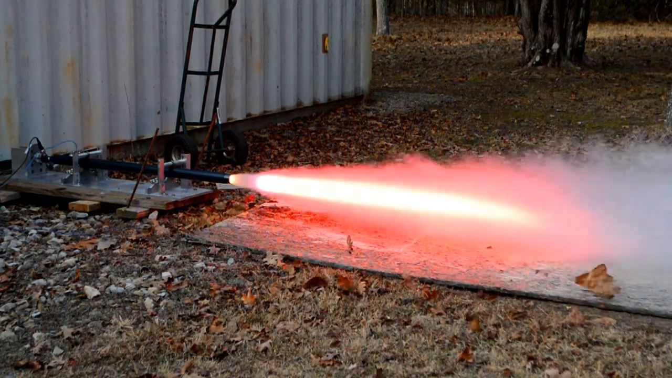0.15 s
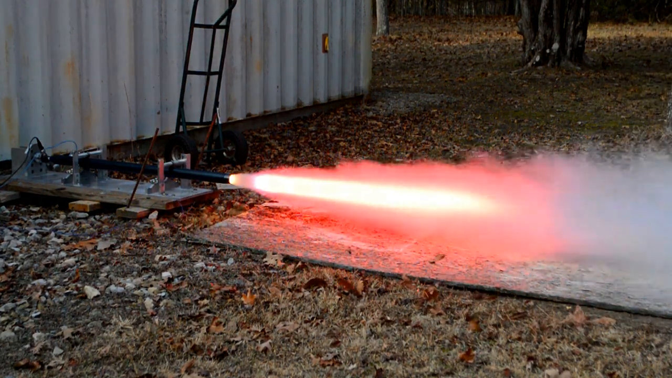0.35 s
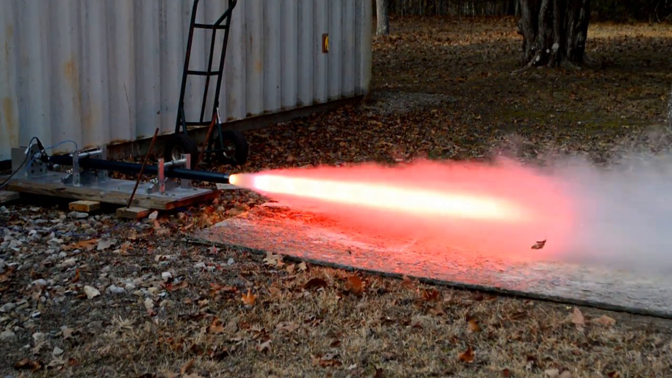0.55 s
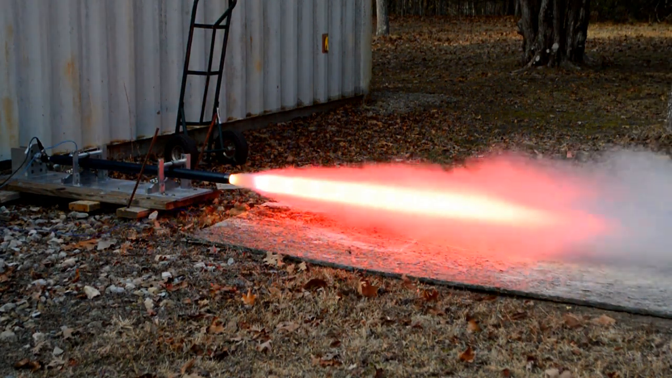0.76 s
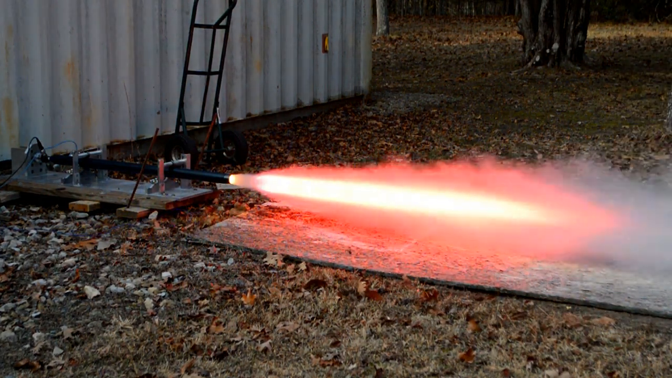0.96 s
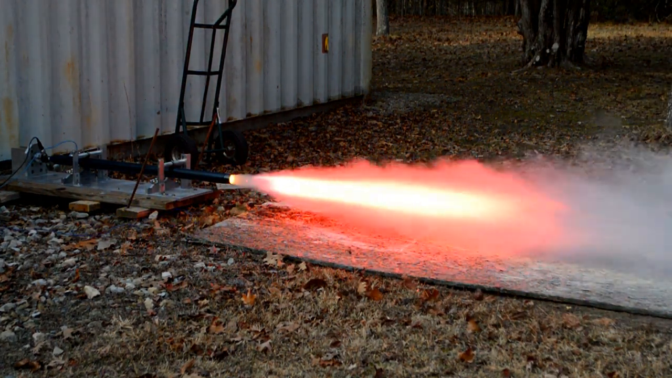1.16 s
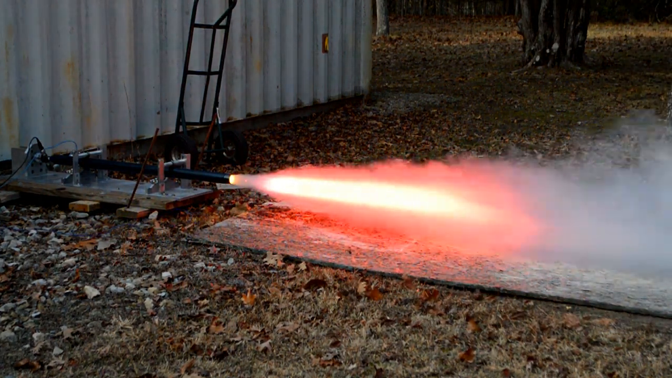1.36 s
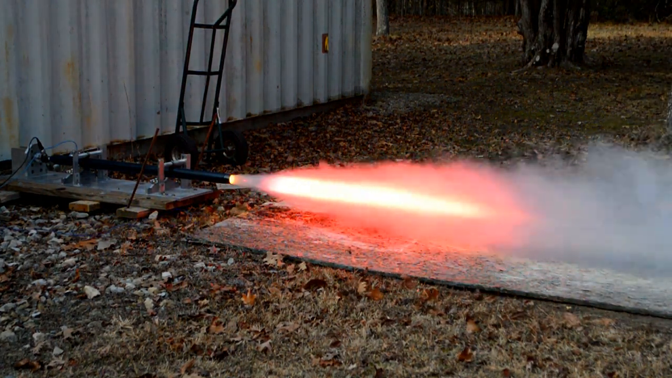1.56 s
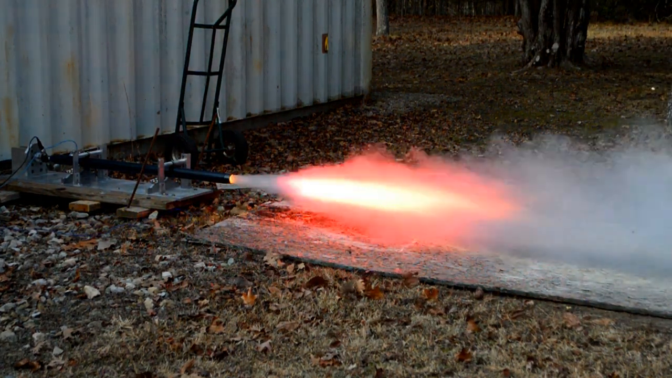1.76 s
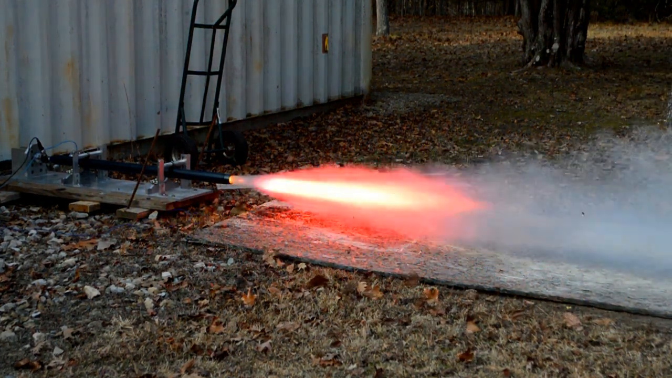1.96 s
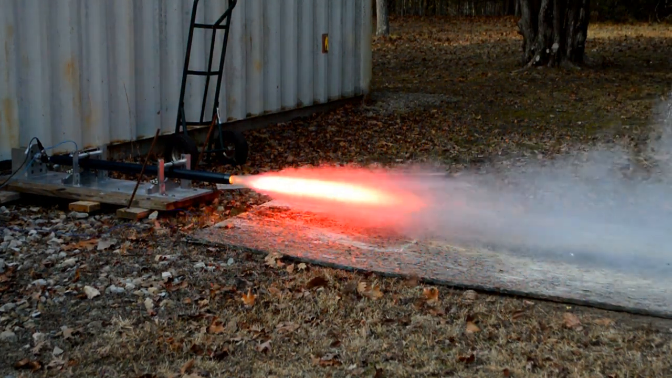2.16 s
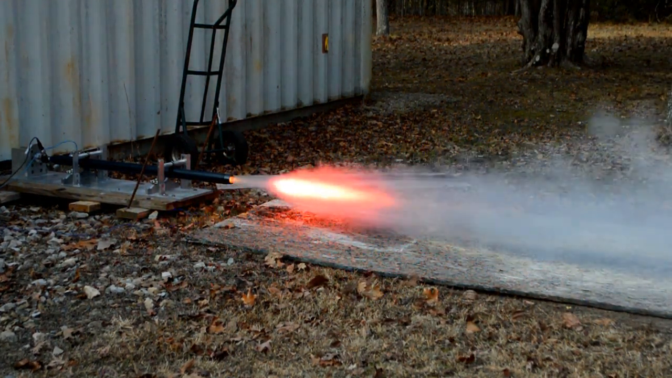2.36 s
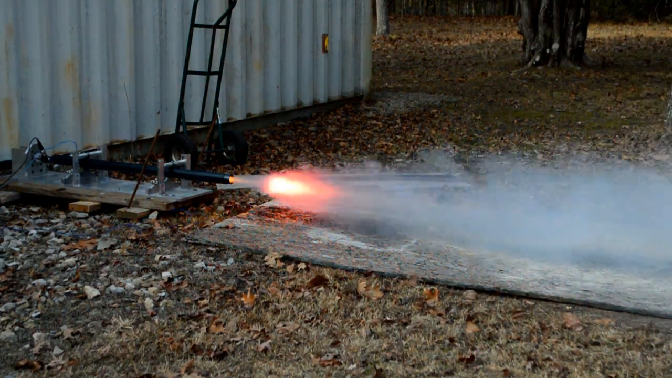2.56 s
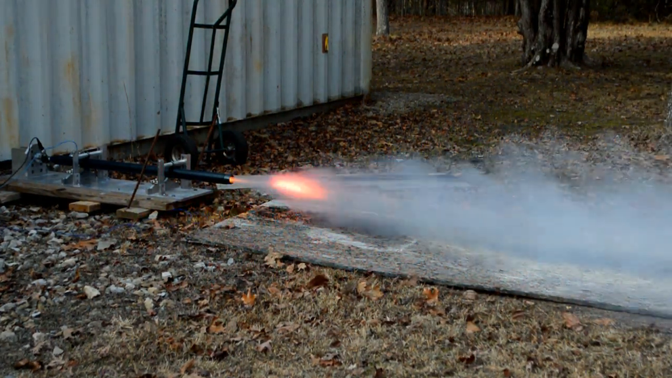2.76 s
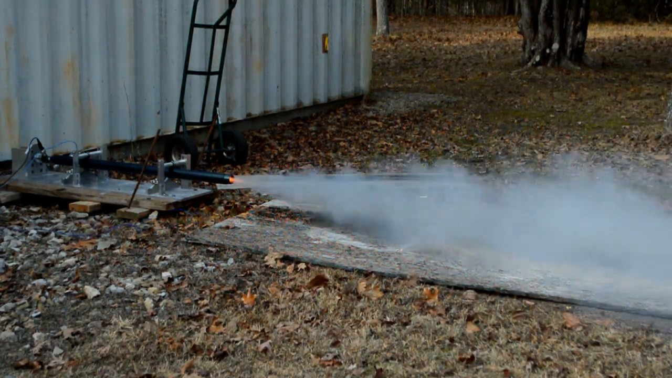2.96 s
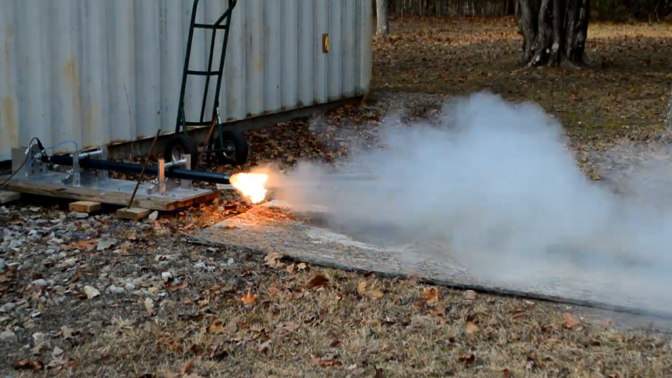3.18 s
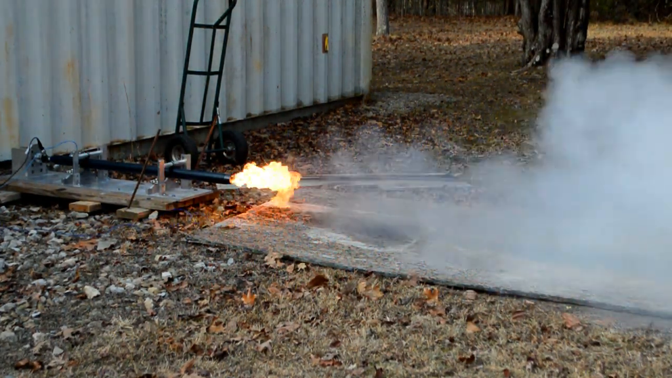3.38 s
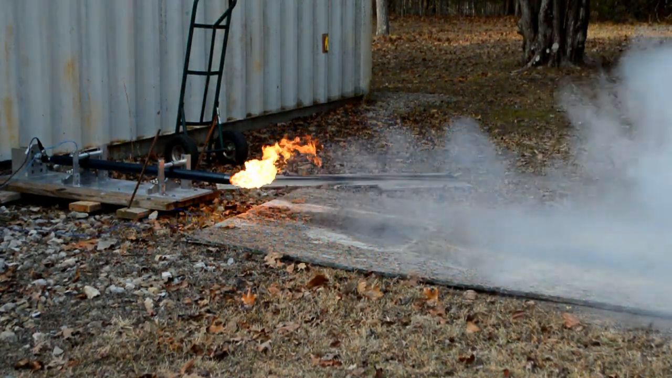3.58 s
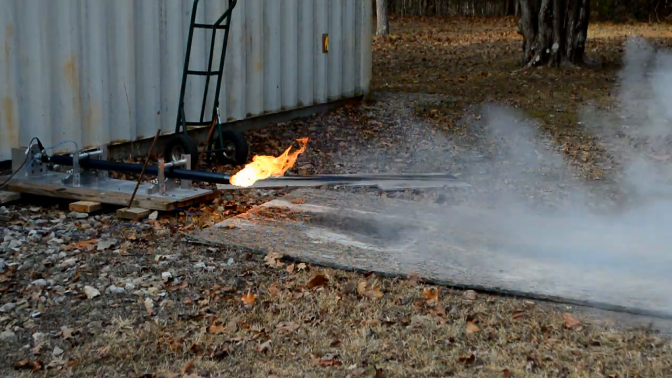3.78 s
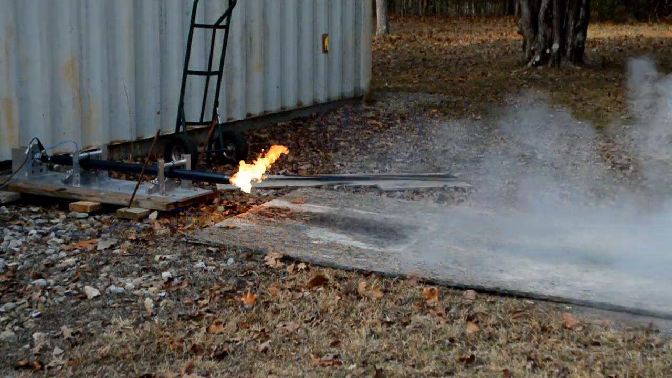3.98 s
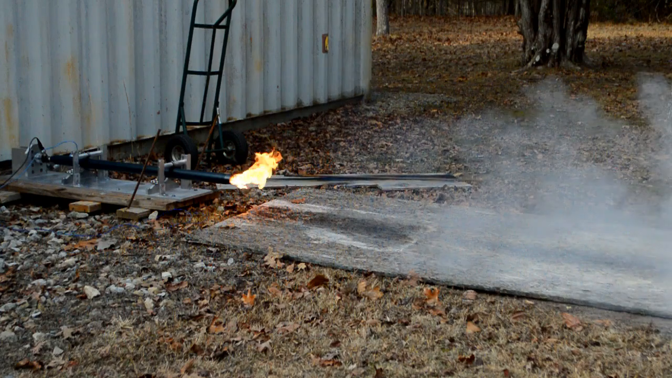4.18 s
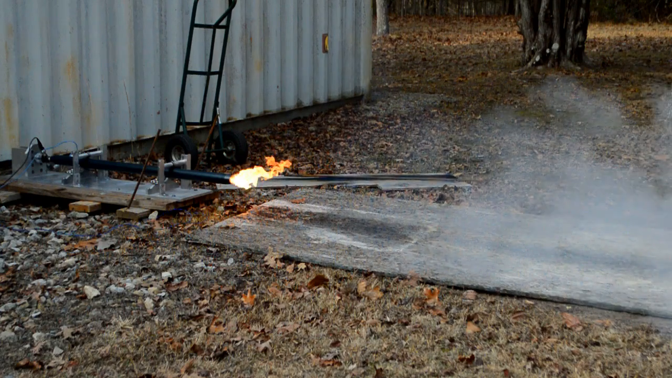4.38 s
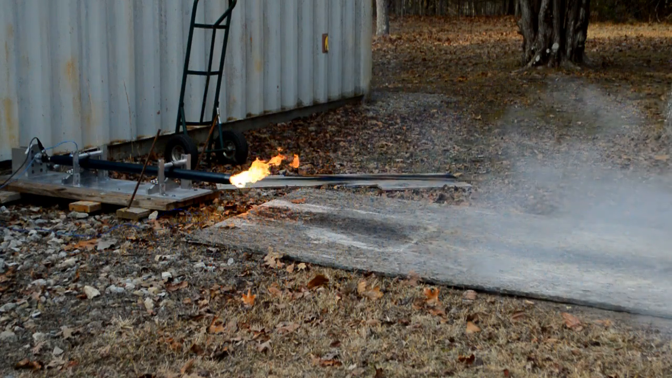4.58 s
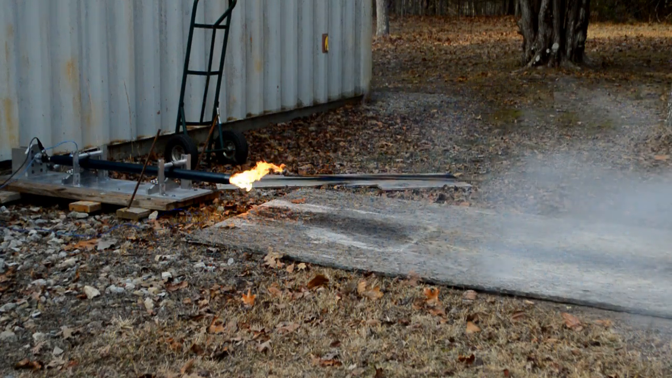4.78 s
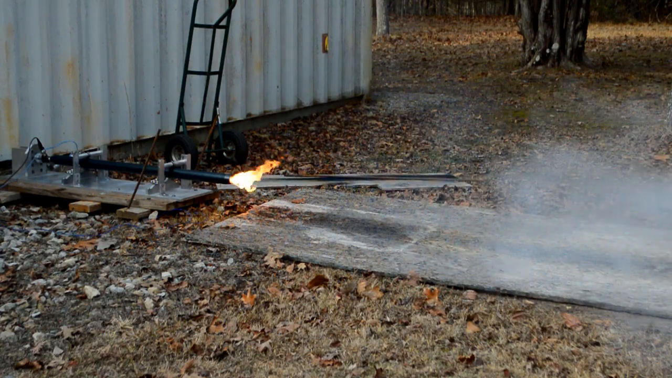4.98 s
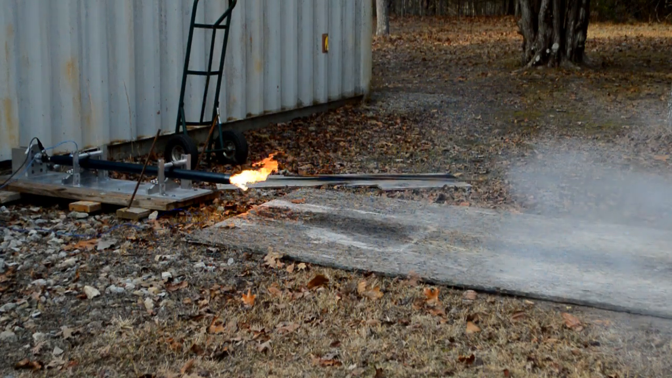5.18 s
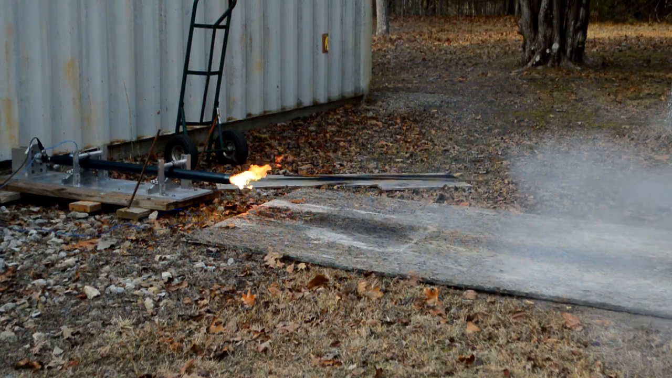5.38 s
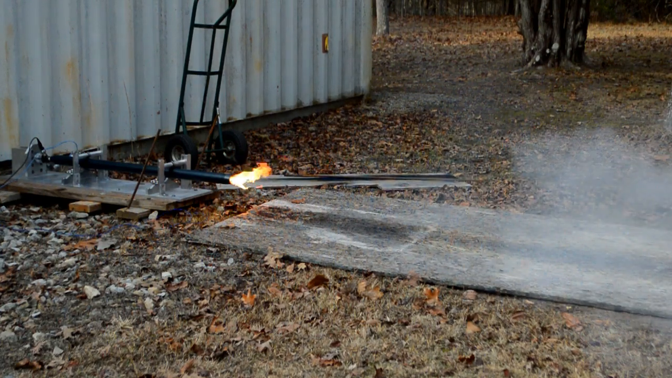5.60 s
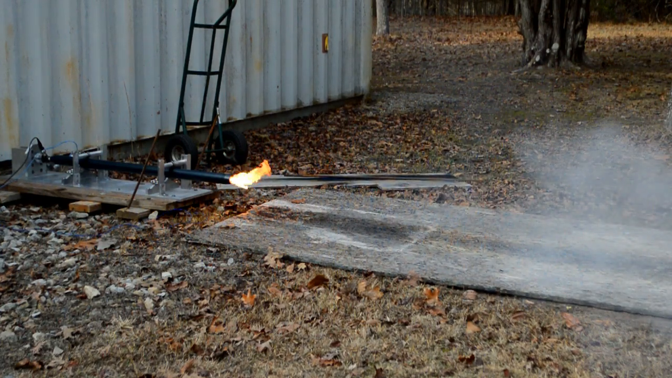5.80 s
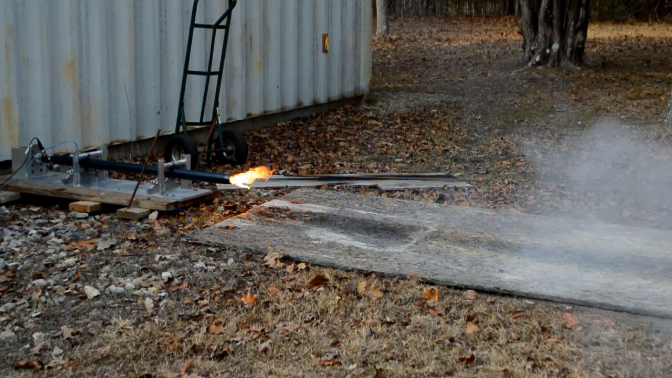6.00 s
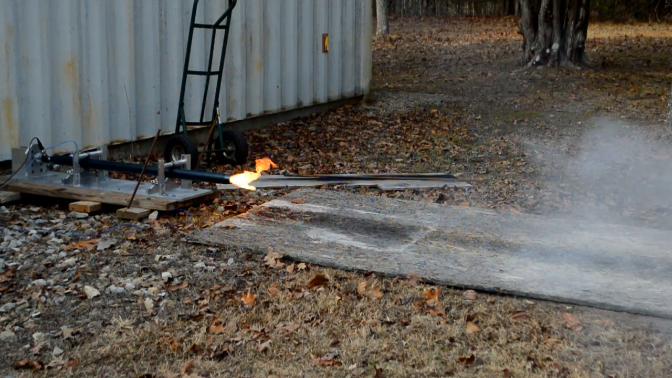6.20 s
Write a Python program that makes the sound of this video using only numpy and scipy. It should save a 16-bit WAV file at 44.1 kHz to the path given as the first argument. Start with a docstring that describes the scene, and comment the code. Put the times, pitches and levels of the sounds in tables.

```python
"""Rocket motor on a test stand

A small solid rocket motor roars outdoors: coloured noise that overloads a ringing microphone and turns its gain down.
It burns out with a sputter and a venting hiss; as the gain creeps back, bands of wavering noise make a lazy
flame that flutters and spits at the nozzle, and gas pops once in the empty casing, which rings as decaying sines.
Near the end a small bird gives one thin, buzzy call: two swooping sines with an uneven buzz in their pitch."""
import sys
import numpy as np
from scipy import signal
from scipy.fft import rfft, irfft, next_fast_len
from scipy.io import wavfile
from scipy.ndimage import uniform_filter1d, minimum_filter1d

SR = 44100
rng = np.random.default_rng(int(sys.argv[2]) if len(sys.argv) > 2 else 0)


def to_wav(sig):
    """Store sig (one row per channel, or 1-D mono) as 16-bit WAV at the path in sys.argv[1].

    Samples outside -1..1 are clipped; the rate is SR.
    """
    pcm = np.clip(np.atleast_2d(sig), -1, 1) * 32767
    pcm = np.round(pcm).astype(np.int16)
    wavfile.write(sys.argv[1], SR, pcm.T)  # frames by channels


N = 275359
TIME = np.arange(N) / SR
BURNOUT_S = 3.176  # the propellant is spent


def from_db(db):
    """Decibels to gain."""
    return 10 ** (np.asarray(db) / 20)


def rms_one(x):
    """Scale to rms 1."""
    return x / np.sqrt(np.mean(x ** 2) + 1e-20)


def noise(colour):
    """Noise of a given spectrum, rms 1, rolled off below the first frequency of its table."""
    size = next_fast_len(N)
    hz, db = np.transpose(colour)
    bins = np.fft.rfftfreq(size, 1 / SR) + 1e-3
    gain = from_db(np.interp(np.log(bins), np.log(hz), db))
    gain = gain * np.minimum(bins / hz[0], 1)
    white = rng.standard_normal(size)
    return rms_one(irfft(rfft(white) * gain, size)[:N])


def drift(rate):
    """Smooth chance with about `rate` turns a second, rms 1."""
    r = np.exp(-2 * np.pi * rate / SR)
    settled = signal.lfilter([1], [1, -2 * r, r * r], rng.standard_normal(N + SR))[SR:]
    return rms_one(settled)


def resonance(x, hz, width_hz):
    """A band-pass with gain 1 on top."""
    r = np.exp(-np.pi * width_hz / SR)
    feed = np.array([1, 0, -1]) * (1 - r * r) / 2
    return signal.lfilter(feed, [1, -2 * r * np.cos(2 * np.pi * hz / SR), r * r], x)


def ring(clicks, hz, t60):
    """A unit click sets a sine ringing from height 1; it falls 60 dB in t60 seconds."""
    r = from_db(-60 / (t60 * SR))
    w = 2 * np.pi * hz / SR
    return signal.lfilter([0, np.sin(w)], [1, -2 * r * np.cos(w), r * r], clicks + 1e-18)


def clicks_of(events):
    """One click for each row: time in seconds, height in dB."""
    out = np.zeros(N)
    for s, db in events:
        out[round(s * SR)] += from_db(db)
    return out


def fading(clicks, t60):
    """An envelope that jumps at each click and falls 60 dB in t60 seconds."""
    return signal.lfilter([1], [1, -np.exp(-np.log(1000) / (t60 * SR))], clicks + 1e-18)


def echoes(x, t60, wet_db, count=120):
    """Scattered reflections from the ground, a steel wall and tree trunks, weaker the later they come."""
    delay = rng.uniform(.002, .3, count)  # seconds
    response = np.zeros(SR)
    response[(delay * SR).astype(int)] = rng.standard_normal(count) * np.exp(-np.log(1000) * delay / t60)
    reflected = signal.fftconvolve(x, response / np.linalg.norm(response))[:N]
    return x + from_db(wet_db) * reflected


def envelope(start_s, hold_s, rise_db_per_s, fall_db_per_s):
    """A gain that rises to 1 at start_s, holds, then dies away."""
    before = np.maximum(start_s - TIME, 0)
    after = np.maximum(TIME - start_s - hold_s, 0)
    return from_db(-rise_db_per_s * before - fall_db_per_s * after) + 1e-18


def after_burnout(fall_db_per_s):
    """A gain of 1 while the motor burns that dies away afterwards."""
    return from_db(-fall_db_per_s * np.maximum(TIME - BURNOUT_S, 0)) + 1e-18


# Colour of the exhaust. Each row: frequency in Hz, relative level per Hz in dB.
JET_COLOUR = [(25, -27.5), (50, -40.5), (120, -9.5), (300, -3), (800, 2.5), (2500, 2.5), (4800, 0.5),
              (6500, 1), (8000, -0.5), (10500, -3.5), (12500, -7), (16000, -47.5)]
# Microphone resonances that the jet sets ringing. Each row: frequency in Hz, width in Hz, gain in dB.
MIC_RING = [(9500, 2170, 10.5), (5200, 2700, -15.5)]
JET_DB, COLLAPSE_DB_PER_S = 44.5, 1043.5
LINGER_DB, LINGER_DB_PER_S = -32, 205  # its echo among the trees, relative to the jet
SHORTENS_S, SHORTENING_TAKES_S = 1.77, 1.4  # the plume shortens late in the burn
GROUND_LAG_S, GROUND_SHARE_LONG, GROUND_SHARE_SHORT = 0.0002176, 0.026, 0.29  # shares 0-1, long or short plume


def jet(surge_db=2.0, wander_db=2.23, strained_hz=10300, strained_width_hz=1300, eased_db=-3):
    """Turbulent exhaust rings the microphone; a shortening plume lets the ground reflection colour it more."""
    thrust = after_burnout(COLLAPSE_DB_PER_S)
    shortened = np.clip((TIME - SHORTENS_S) / SHORTENING_TAKES_S, 0, 1)
    ground_share = GROUND_SHARE_LONG + (GROUND_SHARE_SHORT - GROUND_SHARE_LONG) * shortened
    rush = noise(JET_COLOUR)
    rush = rush + ground_share * np.interp(TIME - GROUND_LAG_S, TIME, rush)
    ringing = sum(from_db(db) * resonance(rush, hz, width) for hz, width, db in MIC_RING)
    # at full thrust the ring of the strained diaphragm spreads upwards; it eases as the plume shortens
    strain = thrust * from_db(eased_db * shortened)
    ringing = ringing + strain * resonance(noise(JET_COLOUR), strained_hz, strained_width_hz)
    surging = thrust * from_db(surge_db * drift(24))
    lingering = from_db(LINGER_DB) * after_burnout(LINGER_DB_PER_S)
    body = rms_one(rush * from_db(wander_db * drift(21.0)) + ringing)
    return from_db(JET_DB) * (surging + lingering) * body


# Colours of the sputter, the bright rush, and the roar and hiss that the flame shares.
# Each row: frequency in Hz, relative level per Hz in dB.
SPUTTER_COLOUR = [(60, -20), (180, -8), (290, 3), (420, -5), (600, 1), (870, 2), (1400, -6), (2500, -9),
                  (3600, -2), (5000, -12), (12000, -35)]
BLOWDOWN_COLOUR = [(300, -14.5), (1500, -11.5), (3200, 0.5), (5000, -1.5), (6500, -0.5), (8000, -2.5),
                   (10000, -8.5), (16000, -38)]
ROAR_COLOUR = [(200, -28), (400, -3), (600, -5), (800, -1.5), (1200, -4.5), (1500, -7), (2200, -12.5),
               (4000, -45.5)]
HISS_COLOUR = [(700, -25.5), (1200, 3.5), (1700, -5.5), (2400, -0.7), (3200, -3.5), (4500, -3.5),
               (6500, -14), (9000, -42.5), (16000, -57)]
SPUTTER_S, SPUTTER_HOLD_S, SPUTTER_DB = 3.16, .036, 21
BLOWDOWN_DB_PER_S = 72.5  # the bright rush starts to fall from 0 dB
VENT_DB, VENT_DB_PER_S, VENT_ROAR_DB = -12.5, 29, -3  # roar level relative to the hiss


def burnout():
    """A last throaty sputter, then chamber pressure hisses away: a bright rush dies fast, a duller hiss slowly."""
    sputter = from_db(SPUTTER_DB) * envelope(SPUTTER_S, SPUTTER_HOLD_S, rise_db_per_s=4000, fall_db_per_s=900)
    blowdown = after_burnout(BLOWDOWN_DB_PER_S)
    vent = from_db(VENT_DB) * after_burnout(VENT_DB_PER_S)
    dull_hiss = noise(HISS_COLOUR) + from_db(VENT_ROAR_DB) * noise(ROAR_COLOUR)
    return sputter * noise(SPUTTER_COLOUR) + blowdown * noise(BLOWDOWN_COLOUR) + vent * dull_hiss


CATCH_DB, CATCHING_TAKES_S = -3.5, 0.42  # below full strength until burnout, then growing to it
SINKS_S, SINKING_TAKES_S = 5.17, 0.14


def dwindling(full_db, fade_db_per_s, sink_db):
    """Level in dB of one part of the flame: it catches, fades steadily and sinks once by a further step."""
    age = np.maximum(TIME - BURNOUT_S, 0)
    catching = np.clip(1 - age / CATCHING_TAKES_S, 0, 1)
    sunk = np.clip((TIME - SINKS_S) / SINKING_TAKES_S, 0, 1)
    return full_db + CATCH_DB * catching - fade_db_per_s * age - sink_db * sunk


# Colours of flame flutter, liner sizzle and spits. Each row: frequency in Hz, relative level per Hz in dB.
FLUTTER_COLOUR = [(25, -2.5), (60, -6), (150, 3.5), (220, -1), (300, 1.9), (400, -4.5), (600, -5.5),
                  (1500, -51)]
SIZZLE_COLOUR = [(4000, -28.5), (6500, -2), (8000, 8.5), (9200, 10.5), (10500, 3), (12500, -15),
                 (16000, -26.5)]
SPIT_COLOUR = [(800, -5), (2000, 17), (4500, 15), (6700, -2), (8800, 15), (11000, -10), (16000, -17)]
# Burning scraps spit. Each row: start in seconds, starting level in dB.
SPITS = [(3.875, -29), (4.387, -37), (4.485, -43), (4.731, -47), (4.774, -41), (5.002, -45), (5.106, -39),
         (5.201, -56), (5.595, -51)]


def afterburn(flutter_rough_db=0.2, roar_rough_db=0.46, hiss_rough_db=0.5, sizzle_rough_db=1.9):
    """The flame flutters and roars softly while gas hisses and the hot liner sizzles; all fade as it shrinks."""
    lapping, flicker, frying = drift(30), drift(45), drift(70)
    flutter_db = dwindling(full_db=-25, fade_db_per_s=7, sink_db=3) + flutter_rough_db * lapping
    roar_db = dwindling(full_db=-21.5, fade_db_per_s=10.9, sink_db=0.56) + roar_rough_db * flicker
    hiss_db = dwindling(full_db=-37, fade_db_per_s=7.96, sink_db=1.2) + hiss_rough_db * flicker
    sizzle_db = dwindling(full_db=-41.5, fade_db_per_s=8.7, sink_db=2.5) + sizzle_rough_db * frying
    flame = from_db(flutter_db) * noise(FLUTTER_COLOUR) + from_db(roar_db) * noise(ROAR_COLOUR)
    gas = from_db(hiss_db) * noise(HISS_COLOUR) + from_db(sizzle_db) * noise(SIZZLE_COLOUR)
    spits = fading(clicks_of(SPITS), t60=0.054) * noise(SPIT_COLOUR)
    return flame + gas + spits


# The pop and its return from the closed end of the casing. Each row: start in seconds, level in dB.
POP = [(4.1913, -11), (4.194, -1)]
# Gas column and wall of the casing.
# Each row: frequency in Hz, level in dB, 60 dB decay time in seconds, start after the first kick in seconds.
CASING = [(115, -24, .14, .003), (305, -7, .13, .0033), (520, -14, .08, .003), (735, -19, .08, 0),
          (940, -18, .09, 0), (1140, -9, .1, 0), (1205, -16, .13, .0033), (2130, -23, .05, 0),
          (2285, -20, .1, .008), (2350, -27, .07, .008), (3390, -12, .022, .008)]
# Colour of the crack. Each row: frequency in Hz, relative level per Hz in dB.
CRACK_COLOUR = [(200, -2), (1500, 2), (3000, -8), (5300, -3), (7000, -12), (9000, -1), (11000, -15),
                (16000, -34)]


def pop(crack_db=-17, thump_hz=1050, thump_t60=0.0022):
    """Gas lights inside the casing: a short thump and crack, and the tube rings on like a closed pipe."""
    kicks = clicks_of(POP)
    start_s = POP[0][0]
    thump = ring(kicks, thump_hz, thump_t60)
    tube = sum(ring(clicks_of([(start_s + lag, db)]), hz, t60) for hz, db, t60, lag in CASING)
    crack = from_db(crack_db) * fading(kicks, t60=0.033) * noise(CRACK_COLOUR)
    # thump and tube swing downwards first
    return echoes(crack - thump - tube, t60=.18, wet_db=-20)


# The bird's two voices. Each row: lowest pitch in Hz, height of the swoop at the call's start in Hz,
# swoop time in seconds, lift in Hz, buzz depth in Hz, buzz added by the lift in Hz, level in dB.
VOICES = [(7720, 540, .016, 480, 70, 10, 0), (8240, 1000, .012, 850, 80, 240, -2)]
CALL_S, CALL_HOLD_S, CALL_DB = 5.938, 0.15, -35
LIFT_AFTER_S, LIFT_TAKES_S = .065, .11
BIRD_TOP_HZ = 9780  # ceiling of the pitch before the buzz


def bird():
    """Both sides of the syrinx whistle: pitch swoops down, then lifts and grows buzzier, fast and uneven."""
    regular_buzz = np.sin(2 * np.pi * np.cumsum(150 + 25 * drift(30)) / SR)
    buzz = regular_buzz + .9 * drift(250)
    age = np.maximum(TIME - CALL_S, -.1)
    lifted = np.clip((age - LIFT_AFTER_S) / LIFT_TAKES_S, 0, 1)
    call = 0
    for low_hz, swoop_hz, swoop_s, lift_hz, buzz_hz, added_hz, db in VOICES:
        hz = np.minimum(low_hz + swoop_hz * np.exp(-age / swoop_s) + lift_hz * lifted, BIRD_TOP_HZ)
        buzzing_hz = hz + (buzz_hz + added_hz * lifted) * buzz
        call = call + from_db(db) * np.sin(2 * np.pi * np.cumsum(buzzing_hz) / SR)
    loudness = envelope(CALL_S, CALL_HOLD_S, rise_db_per_s=1000, fall_db_per_s=450)
    return echoes(call * from_db(CALL_DB) * loudness, t60=.3, wet_db=-8)


def scene():
    """All sources reach one microphone, which feeds both channels."""
    sound = jet() + burnout() + afterburn() + pop() + bird()
    return np.array([sound, sound])


def overload(x, top_db):
    """The microphone stage saturates softly; it runs at four times the rate to limit aliasing."""
    top = from_db(top_db)
    fine = signal.resample_poly(x, 4, 1, axis=-1)
    return signal.resample_poly(top * np.tanh(fine / top), 1, 4, axis=-1)


def gain_control(x, target_db, hold_s, release_s):
    """Turns loud sound down at once, holds, then lets the gain creep back."""
    power = uniform_filter1d(np.mean(x ** 2, axis=0), size=3000)
    excess_db = np.maximum(10 * np.log10(np.maximum(power, 1e-12)) - target_db, 0)
    half = int(hold_s * SR / 2)
    # the largest excess of the last hold_s seconds
    held_db = -minimum_filter1d(-excess_db, 2 * half + 1, origin=half)
    # the cut in dB relaxes exponentially until a larger one takes over
    relax = np.exp(-TIME / release_s)
    cut_db = np.maximum.accumulate(held_db / relax) * relax
    return x * from_db(-cut_db)


# Colour of the recorder noise. Each row: frequency in Hz, relative level per Hz in dB.
FLOOR_COLOUR = [(30, 16.5), (300, 7), (2000, -2), (9000, -3), (12000, -7.5), (16000, -4)]
FLOOR_DB, SIDE_NOISE_DB = -55, -31.5  # each channel's own noise is relative to the shared noise
WHINE_DB, WHINE_HZ = -57.5, 15676
LOW_CUT_HZ, CUTOFF_HZ = 93, 15760


def record(dry):
    """Overload and a low cut, then hiss and a thin electronic whine join, gain control acts and the top is cut."""
    low_cut = signal.butter(2, LOW_CUT_HZ, "high", fs=SR, output="sos")
    heard = signal.sosfilt(low_cut, overload(dry, top_db=23.5))
    side_noise = np.array([noise(FLOOR_COLOUR), noise(FLOOR_COLOUR)])
    own_noise = from_db(FLOOR_DB) * (noise(FLOOR_COLOUR) + from_db(SIDE_NOISE_DB) * side_noise)
    # root 2 makes the whine's level an rms level
    whine = from_db(WHINE_DB) * np.sqrt(2) * np.sin(2 * np.pi * WHINE_HZ * TIME)
    out = gain_control(heard + own_noise + whine, target_db=-8.0, hold_s=.2, release_s=.14)
    return signal.sosfilt(signal.ellip(12, .1, 80, CUTOFF_HZ, fs=SR, output="sos"), out)


dry = scene()
out = record(dry)
to_wav(out)
```